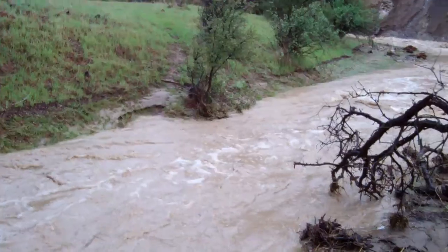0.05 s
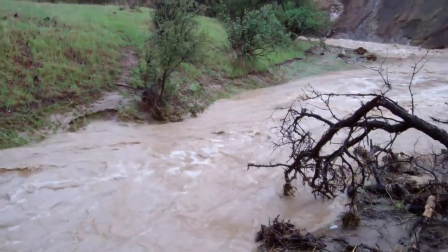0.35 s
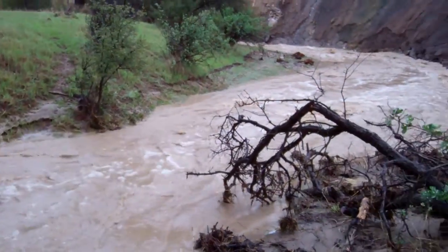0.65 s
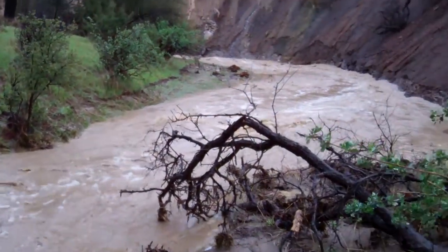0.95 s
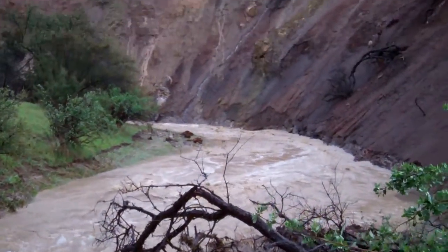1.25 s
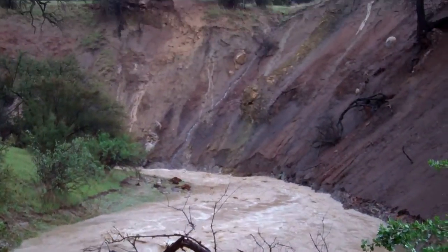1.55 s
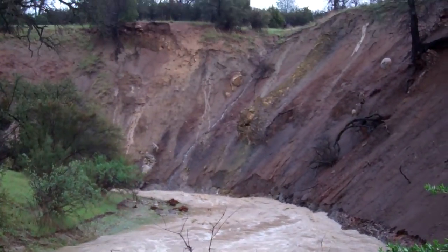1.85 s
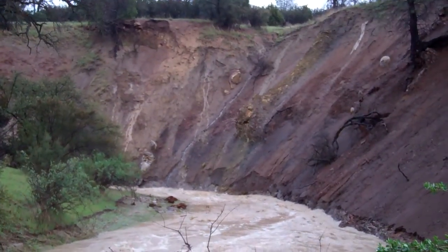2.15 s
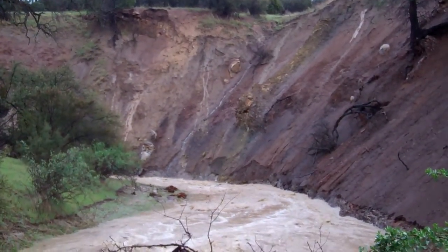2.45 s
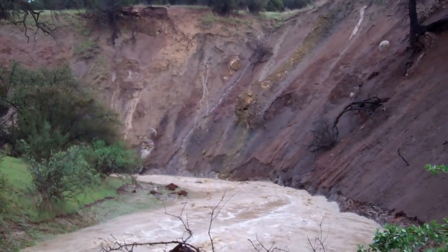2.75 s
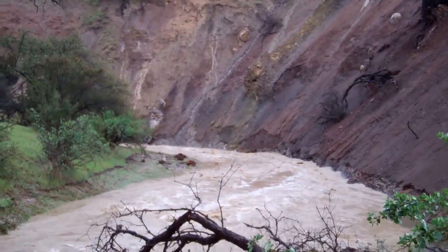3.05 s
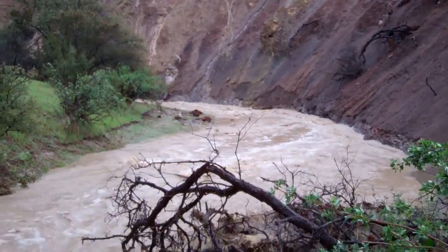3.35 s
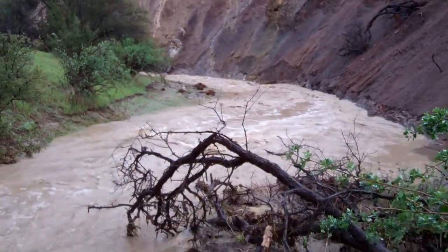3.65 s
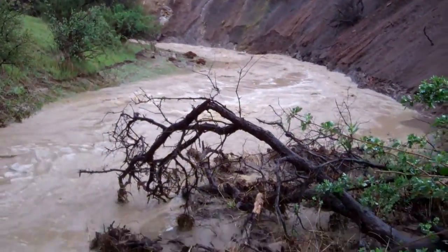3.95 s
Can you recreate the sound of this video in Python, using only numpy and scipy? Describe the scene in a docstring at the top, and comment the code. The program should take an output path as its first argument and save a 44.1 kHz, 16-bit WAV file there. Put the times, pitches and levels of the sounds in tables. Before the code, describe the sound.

A flooded river roars steadily, with three sharp ticks close to the microphone.

```python
"""Flooded river at a bend

Muddy water roars below a hand-held camera: a broad, churning rush thick with ringing bubbles,
its spray brighter on the left. A light breeze puffs on the microphone ports. Three sharp ticks
close to the microphone make the camera's gain control duck the river, which then swells back."""
import sys
import numpy as np
from scipy import signal
from scipy.fft import rfft, irfft, next_fast_len
from scipy.io import wavfile
from scipy.ndimage import uniform_filter1d, minimum_filter1d, map_coordinates

SR = 44100
rng = np.random.default_rng(int(sys.argv[2]) if len(sys.argv) > 2 else 0)


def persist_wave(psi):
    """Save psi, clipped to +-1, as 16-bit WAV."""
    counts = np.round(np.clip(psi, -1, 1) * 32767).astype(np.int16)
    wavfile.write(sys.argv[1], SR, np.atleast_2d(counts).T)


N = 176400

# surges in the rush: time_s, gain_db
FLOW_SURGES = [(.07, 0.5), (.28, 1.5), (.33, 2.3), (.5, 0), (.7, 2), (.85, 0), (1.04, 2), (1.18, 0.5),
               (1.35, 2), (1.55, 1.4), (1.59, -0.5), (1.85, 0.6), (2.35, 0.87), (2.62, 1.5), (2.95, 1.67),
               (3.4, 1.7), (3.62, 1.4), (3.7, 0), (3.87, 1.1), (4, 1.2)]
# the deep roar, thinnest while the camera first points down at the near water: time_s, gain_db
DEEP_RIDE = [(.2, -3), (.75, 1), (1.15, -2.5), (1.48, 1), (1.72, -2), (2, 1), (2.8, 0), (3.35, 1.3),
             (3.85, -1)]
# the hollow roar, fullest while the camera faces the bend under the cliff: time_s, gain_db
HOLLOW_RIDE = [(.2, 0.5), (.5, -0.8), (.9, -0.5), (1.1, -2.3), (1.5, 0.5), (1.75, 2), (2.05, 0.7),
               (2.4, 0.8), (2.8, 0), (3, -0.2), (3.5, -0.5), (4, -1.8)]
# its two broad resonances: centre_hz, width_hz
HOLLOW_RESONANCES = [(570, 120), (860, 230)]
# tone of the water: frequency_hz, gain_db
WATER_EQ = [(20, -26), (40, -21), (65, -15.5), (130, -7), (300, -2.5), (440, -1.47), (590, 0.4),
            (700, -1.16), (860, 0.95), (1050, -1.2), (1400, -3.5), (2600, -7), (3800, -9.5), (5300, -13.5),
            (7500, -17), (9600, -19.5), (11200, -27.5), (12400, -34), (14000, -45)]
# how far the water leans left: frequency_hz, left_minus_right_db
LEFT_LEAN = [(300, 1), (1200, 1), (2600, 1.4), (3800, 4), (5300, 4), (7000, 7.5), (9300, 10.5),
             (11000, 7.5), (12400, 0)]
# width of the water, 1 for mono and 0 for fully wide: frequency_hz, likeness
STEREO_LIKENESS = [(25, 0.2), (70, 0.98), (200, 1), (550, 0.98), (1000, 0.94), (1500, 0.8), (2200, 0.42),
                   (3500, 0.14), (8000, 0.24)]
# phase by which the left port leads: frequency_hz, lead_rad
LEFT_LEAD = [(0, 0), (1000, .38), (3000, 1), (4200, 1.7), (5300, 3.6), (8500, 5.2), (11000, 5.2),
             (12500, 6.2)]
# puffs of breeze on the ports: peak_s, half_width_s, level_db
BREEZE_PUFFS = [(.34, .05, -60), (1.03, 0.11, -62), (1.6, .15, -68), (2.8, 0.055, -52), (3.25, .35, -65)]
# tone of the breeze: frequency_hz, gain_db
BREEZE_EQ = [(8, -15), (25, -3), (50, 15), (110, -20), (300, -45), (1000, -120)]
# ticks at the left port, ahead of the gain control: time_s, peak_db
CLOSE_TICKS = [(.377, -9.5), (.782, -18.5), (1.843, -14.5)]


def amp(db):
    """Decibels to gain."""
    return 10 ** (np.asarray(db) / 20)


def unit(x):
    """Scale to rms 1."""
    return x / np.sqrt(np.mean(x ** 2) + 1e-20)


def along(points, hz):
    """Read a curve on a log frequency axis."""
    frequencies, values = np.transpose(points)
    return np.interp(np.log(hz + 1), np.log(frequencies + 1), values)


def ride(points):
    """A fader move through timed points."""
    return np.interp(np.arange(N) / SR, *np.transpose(points))


def wobble(rate_hz):
    """A smooth random drift."""
    return map_coordinates(rng.standard_normal(1024), [np.arange(N) * rate_hz / SR], mode="mirror")


def filtered(x, response):
    """Shape x with a complex frequency response."""
    size = next_fast_len(N + SR // 2)
    return irfft(rfft(x, size) * response(np.fft.rfftfreq(size, 1 / SR)), size)[..., :N]


def churn(patchy_db):
    """Churning water: two white noises swell together in short patches of time and pitch."""
    spectrum = signal.stft(rng.standard_normal((2, N)), nperseg=256)[2]
    patches = uniform_filter1d(rng.standard_normal(spectrum.shape[1:]), size=9, axis=0, mode="wrap")
    patches = unit(uniform_filter1d(patches, size=12, axis=1))
    return unit(signal.istft(spectrum * amp(patchy_db * patches), nperseg=256)[1][:, :N])


def water_pings(count, low_hz, high_hz, cycles, scatter_db, rise):
    """Bubbles or spray: short rings scattered over two channels, each gliding up as it dies."""
    when, pan, smallness, weakness = rng.random((4, count, 1))
    pitch_hz = low_hz * (high_hz / low_hz) ** smallness
    offsets = np.arange(SR // 100)
    age = pitch_hz * offsets / SR / cycles  # 1 once the ring has fallen 60 dB
    envelope = amp(-scatter_db * weakness - 60 * age) * np.sqrt(pitch_hz)
    rings = envelope * np.sin(2 * np.pi * cycles * age * (1 + rise * age / 2))
    slots = ((when * N).astype(int) + offsets).ravel()
    panned = [rings * law(2 * np.pi * pan) for law in (np.cos, np.sin)]
    return unit(np.array([np.bincount(slots, channel.ravel(), N)[:N] for channel in panned]))


def at_ports(pair):
    """The wide river at two close ports: near mono in the bass, wide and left-heavy in the treble."""
    def tone_and_width(hz):
        spread = np.arccos(np.clip(along(STEREO_LIKENESS, hz), 0, 1)) / 2
        return amp(along(WATER_EQ, hz)) * [np.cos(spread), np.sin(spread)]

    def lean_left(hz):
        split = np.array([[.5], [-.5]])
        lead_rad = np.interp(hz, *np.transpose(LEFT_LEAD))
        return amp(split * along(LEFT_LEAN, hz)) * np.exp(1j * split * lead_rad)

    mid, side = filtered(pair, tone_and_width)
    return unit(filtered(np.array([mid + side, mid - side]), lean_left))


def shifting_roar(water, deep_hz=250):
    """The deep and hollow bands of the roar swell and thin as the camera turns."""
    deep = filtered(water, lambda hz: 1 / (1 + (hz / deep_hz) ** 4))
    hollow = filtered(water, lambda hz: sum(1 / (1 + (2 * (hz - centre_hz) / width_hz) ** 4)
                                            for centre_hz, width_hz in HOLLOW_RESONANCES))
    return water + (amp(ride(DEEP_RIDE)) - 1) * deep + (amp(ride(HOLLOW_RIDE)) - 1) * hollow


def river(base_db=-31.5):
    """Churn, bubbles and flickering spray, all riding on the strength of the flow."""
    body = churn(patchy_db=0.91)
    bubbles = water_pings(count=4000, low_hz=504, high_hz=3040, cycles=21, scatter_db=13.5, rise=0.21)
    spray_db = -8.5 + wobble(rate_hz=18)
    spray = water_pings(count=6500, low_hz=3800, high_hz=11600, cycles=5.8, scatter_db=15.5, rise=.1)
    water = at_ports(body + amp(-20) * bubbles + amp(spray_db) * spray)
    flow_db = base_db + ride(FLOW_SURGES) + 0.31 * wobble(rate_hz=21.31)
    return amp(flow_db) * shifting_roar(water)


def breeze():
    """Air brushes the ports in soft low puffs, with a different rumble at each."""
    t = np.arange(N) / SR
    puffs = sum(amp(level_db) * np.exp(-((t - peak_s) / half_width_s) ** 2)
                for peak_s, half_width_s, level_db in BREEZE_PUFFS)
    rumble = filtered(rng.standard_normal((2, N)), lambda hz: amp(along(BREEZE_EQ, hz)))
    return puffs * unit(rumble)


def ticks(pitch_hz=8400, half_width_s=0.0001, right_db=-26):
    """Tiny bright clicks, a cycle or two long, nearer the left port."""
    left = np.zeros(N)
    for time_s, peak_db in CLOSE_TICKS:
        t = np.arange(N) / SR - time_s
        left += amp(peak_db) * np.cos(2 * np.pi * pitch_hz * t) * np.exp(-(t / half_width_s) ** 2)
    return np.array([left, amp(right_db) * left])


def gain_control(x, sense_hz=5130, threshold_db=-21, sink_s=0.038, hold_s=0.16, release_s=0.16):
    """Treble peaks duck both channels at once; the gain sinks a little more, holds, then creeps back."""
    sidechain = np.abs(filtered(x, lambda hz: hz > sense_hz)).max(axis=0)
    over_db = np.maximum(20 * np.log10(sidechain + 1e-9) - threshold_db, 0)
    hold = int(hold_s * SR)
    held_db = -minimum_filter1d(-over_db, hold, origin=(hold - 1) // 2, mode="constant")
    release = np.exp(-np.arange(N) / SR / release_s)
    fast_db = np.maximum.accumulate(held_db / release) * release
    pole = np.exp(-1 / (sink_s * SR))
    slow_db = signal.lfilter([1 - pole], [1, -pole], fast_db)
    fast_share = 0.87
    return x * amp(-fast_share * fast_db - (1 - fast_share) * slow_db)


def scene():
    """River, breeze and ticks at the two ports."""
    return river() + breeze() + ticks()


def record(dry):
    """The camera cuts in, rides its gain and drops the very top of the treble."""
    start_s, fade_s, top_hz = .071, 0.0029, 14150
    fade_in = np.clip((np.arange(N) / SR - start_s) / fade_s, 0, 1)
    return filtered(gain_control(dry * fade_in), lambda hz: hz < top_hz)


dry = scene()
out = record(dry)
persist_wave(out)
```